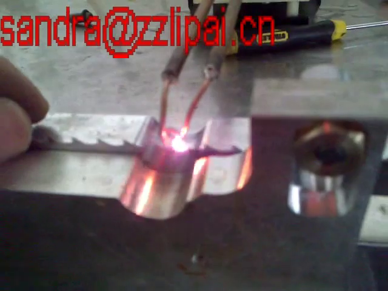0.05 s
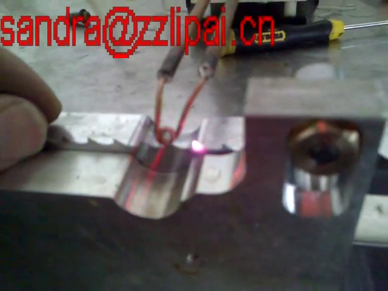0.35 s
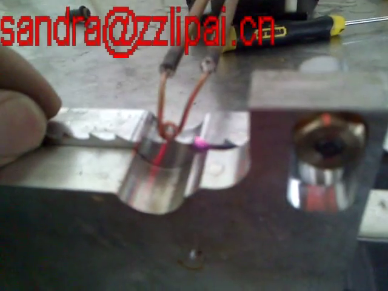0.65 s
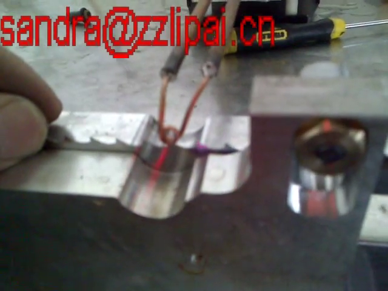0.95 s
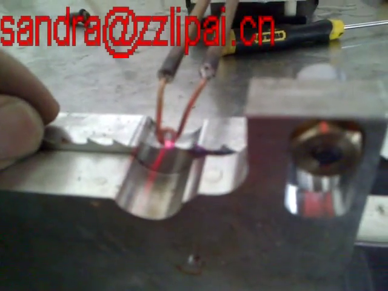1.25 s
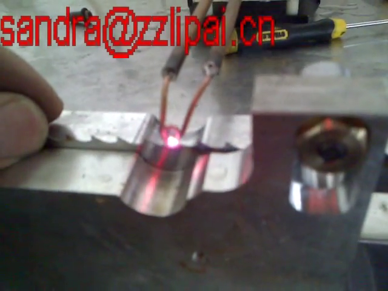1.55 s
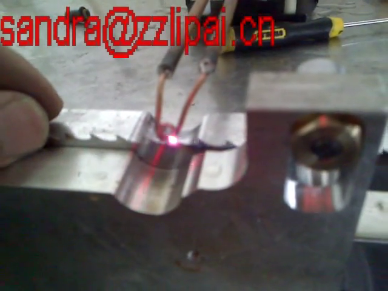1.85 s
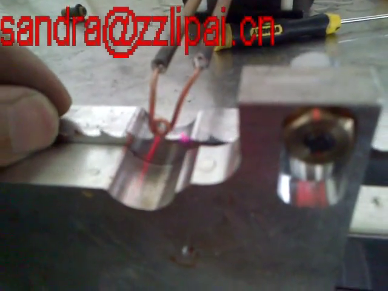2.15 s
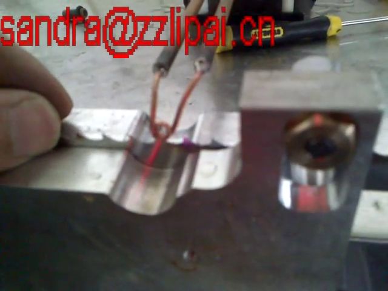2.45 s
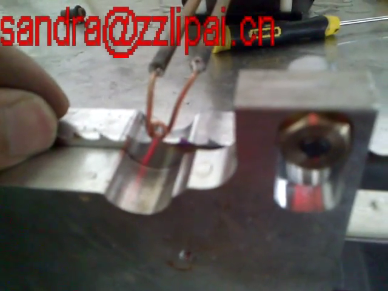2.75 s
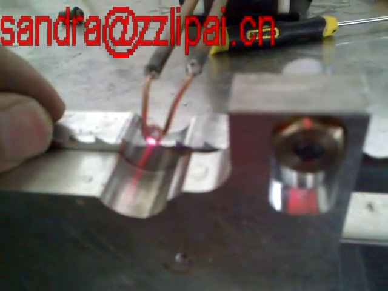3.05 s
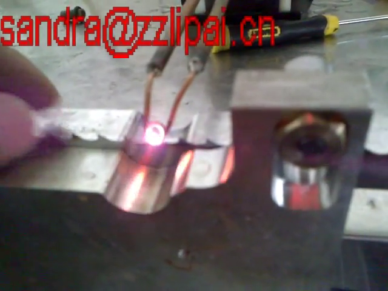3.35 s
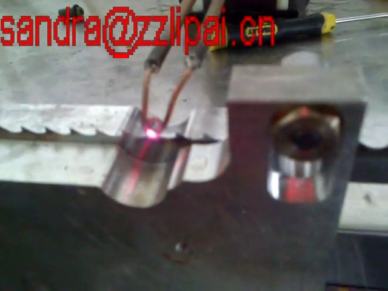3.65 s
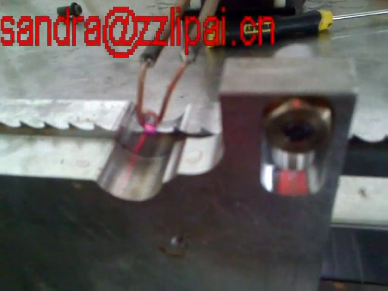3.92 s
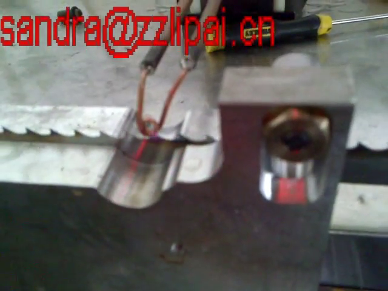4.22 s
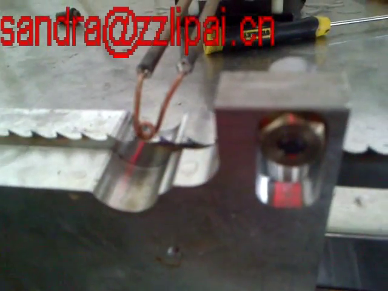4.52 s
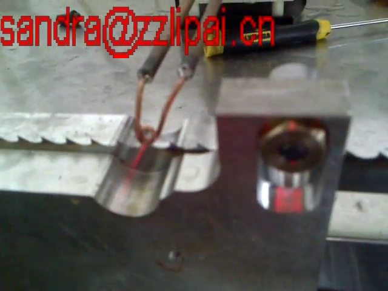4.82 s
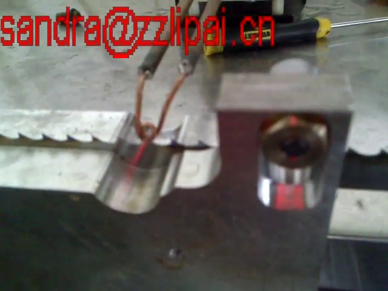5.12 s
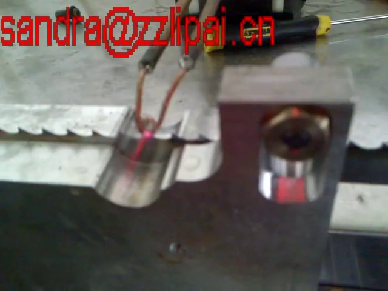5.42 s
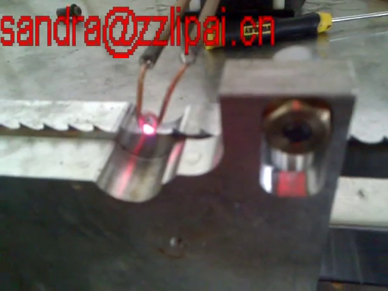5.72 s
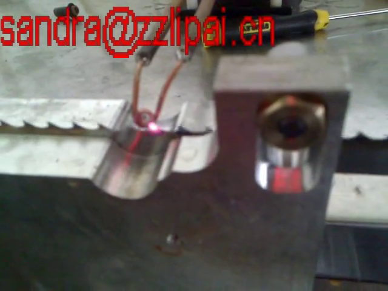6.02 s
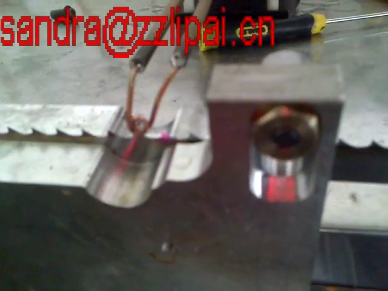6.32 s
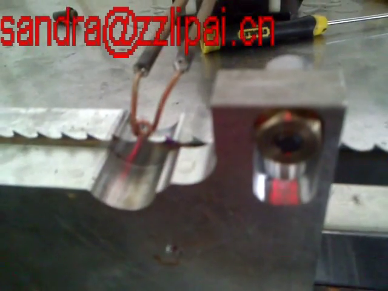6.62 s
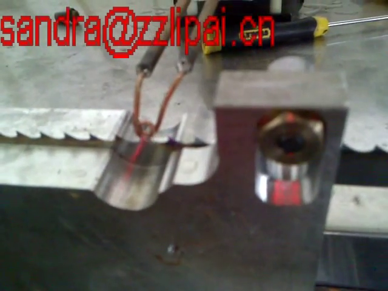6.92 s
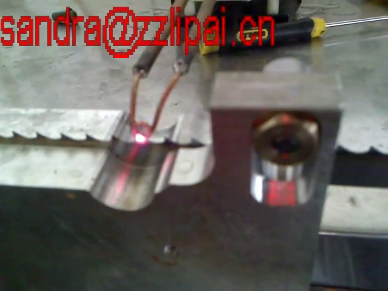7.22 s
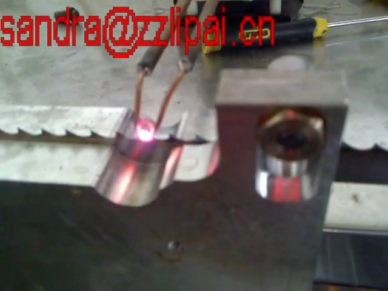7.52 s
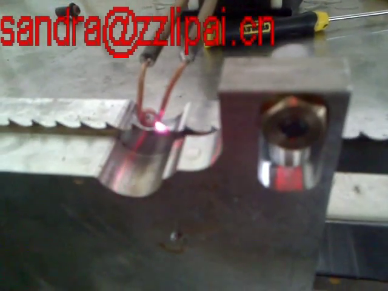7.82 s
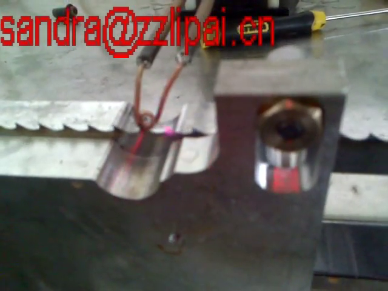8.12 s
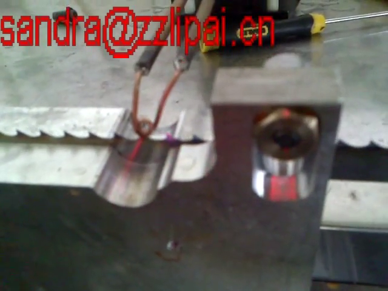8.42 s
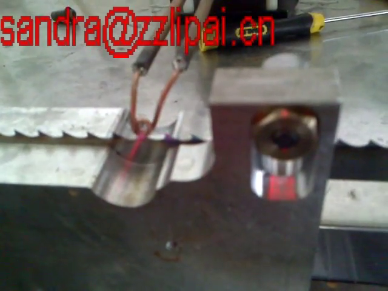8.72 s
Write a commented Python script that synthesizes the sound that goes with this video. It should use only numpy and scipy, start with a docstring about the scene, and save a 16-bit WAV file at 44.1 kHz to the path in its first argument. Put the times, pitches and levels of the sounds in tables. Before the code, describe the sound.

An induction heater's cooling pump runs throughout, a steady, slightly wavering high whine over an even hiss of flowing water and air. The heating coil adds a thin, very high buzz with a faint sizzle five times as it heats the teeth of a saw blade: at the very start until 0.3 seconds, then from about 1.4 to 2, 3.3 to 3.7, 5.6 to 6.2 and 7.2 to 8 seconds. A soft hiss swells briefly around 1.6 seconds. At 4.5 seconds a bright hiss like compressed air sets in and stops at about 5.7. It returns at 6.2 seconds and stays until the end, around 9 seconds, growing slightly while the pump's whine eases a little. Everything is heard from one close microphone at a workshop bench, with no room echo.

```python
"""Induction hardening at a workshop bench

One microphone close by, no room echo. An induction heater hardens a saw blade tooth by tooth.
Its cooling-water pump whines and hisses throughout; the pulsed coil sings a thin, high buzz in each
of five heating shots. Halfway, a bright hiss like compressed air sets in, stops briefly and returns."""
import sys
import numpy as np
from scipy import signal
from scipy.fft import rfft, irfft, next_fast_len
from scipy.io import wavfile

SR = 44100
rng = np.random.default_rng(int(sys.argv[2]) if len(sys.argv) > 2 else 0)


def digitize_waveform(pressure):
    """Quantize a signal to 16-bit integers and store it at the path in sys.argv[1].

    Rows of a 2-D input are taken as channels; values are limited to [-1, 1].
    """
    field = np.atleast_2d(pressure).T
    bounded = np.clip(field, -1, 1)
    quanta = np.round(bounded * 32767).astype(np.int16)
    wavfile.write(sys.argv[1], SR, quanta)


N = 390712
TIME = np.arange(N) / SR
SHAFT_HZ, VANES = 47.455, 40

# pump whine, clustered round the vane harmonics: (multiple of the shaft rate, level [dB])
WHINE_LINES = [(37, -53.5), (38, -50.5), (39, -56), (40, -49.5), (41, -43), (42, -52.5), (80, -54),
               (81, -61), (82, -66), (118, -60.5), (119, -64), (120, -56.5), (154, -58), (158, -59),
               (159, -55.5), (160, -60.5), (162, -56.5), (163, -58), (164, -57), (198, -55.5), (199, -54.5),
               (200, -65), (201, -56.5), (202, -63), (238, -59), (239, -60), (242, -62)]


def from_db(db):
    """Decibels to gain."""
    return 10 ** (np.asarray(db) / 20)


def bump(x, centre, width):
    """Shape of a resonance or a swell: 1 on top, a half at one width from the centre."""
    return 1 / (1 + ((x - centre) / width) ** 4)


def drift(rate_hz):
    """Slow random wander with spread 1: coarse noise twice through a one-pole low-pass."""
    step, settling = 40, 2000
    pole = np.exp(-2 * np.pi * rate_hz * step / SR)
    coarse = rng.standard_normal(N // step + settling + 2)
    slow = signal.lfilter([1], [1, -2 * pole, pole * pole], coarse)[settling:]
    return np.interp(np.arange(N) / step, np.arange(len(slow)), slow / slow.std())


def noise(spectrum, resonances=()):
    """Turbulent noise whose density runs straight between the given points on a log-frequency axis."""
    hz, level_db = np.transpose(spectrum)
    size = next_fast_len(N)
    bins = np.maximum(np.fft.rfftfreq(size, 1 / SR), 1)
    density_db = np.interp(np.log(bins), np.log(hz), level_db)
    density_db += sum(boost_db * bump(bins, centre, width) for centre, width, boost_db in resonances)
    white = rfft(rng.standard_normal(size))
    return irfft(white * from_db(density_db), size)[:N] * np.sqrt(SR / 2)


def cycles(hz):
    """Turns made so far at a changing rate."""
    return np.cumsum(hz) / SR


def tone(turns):
    """A sine of rms 1 with a random starting phase."""
    return np.sqrt(2) * np.sin(2 * np.pi * (turns + rng.random()))


def pump_whine(shaft, waver_db, jitter_turns):
    """Unequal vanes split each vane harmonic into lines one shaft rate apart."""
    whine = np.zeros(N)
    for k, level_db in WHINE_LINES:
        gain = from_db(level_db + waver_db * drift(9.5))
        jitter = jitter_turns * np.sqrt(k / VANES) * drift(7.0)   # the flow unsettles high lines most
        whine += gain * tone(round(k) * shaft + jitter)
    return whine


def pump_churn(shaft, waver_db):
    """Water churns alike on every turn: a skirt of weak shaft harmonics round each vane harmonic."""
    # skirts of the churning water: (multiple of the vane rate, width [Hz], peak level [dB])
    bands = [(1, 290, -58.5), (2, 140, -65), (3, 61, -60), (4, 330, -68), (5, 170, -59), (6, 200, -63),
             (7, 160, -62.5), (8, 150, -71)]
    orders, size = np.arange(325), 8192
    skirts = sum(from_db(level_db) * bump(orders * SHAFT_HZ, round(k) * VANES * SHAFT_HZ, width)
                 for k, width, level_db in bands)
    skirts *= np.minimum(orders / VANES, 1) ** 2   # the housing radiates little below the vane rate
    skirts[[round(k) for k, _ in WHINE_LINES]] = 0   # these harmonics belong to the whine
    phases = np.exp(2j * np.pi * rng.random(len(orders)))
    one_turn = irfft(skirts * phases, size) * size / np.sqrt(2)
    churn = np.interp(shaft % 1 * size, np.arange(size), one_turn)
    return churn * from_db(waver_db * drift(8.5))


def cooling_rush(flicker_db):
    """Steady flow noise of water and air, coloured by the cabinet on its way to the microphone."""
    # flow noise: (frequency [Hz], density [dB per Hz])
    flow = [(140, -135), (190, -110), (320, -106), (600, -95.5), (1000, -84), (1500, -73), (1900, -72.5),
            (2300, -73), (3100, -78), (4200, -80.5), (6500, -82.5), (8700, -80), (12500, -80.5),
            (15500, -85.5)]
    # cabinet resonances: (frequency [Hz], width [Hz], boost [dB])
    panels = [(1868, 115, 4.5), (2700, 140, 0.8), (3490, 250, 1.5), (4660, 140, 1.5)]
    return noise(flow, panels) * from_db(flicker_db * drift(10.3))


def pump_throb(sound, shaft, depth, above_hz):
    """The pump's treble swells once a turn."""
    treble = signal.sosfilt(signal.butter(1, above_hz, "high", fs=SR, output="sos"), sound)
    return sound + depth * tone(shaft) * treble


def cabinet_fan(waver_db):
    """The fan's tones wander with its speed, over a faint rumble from the bench."""
    # hum and whistle of the fan: (frequency [Hz], level [dB])
    lines = [(86, -97), (227.5, -90.5), (341, -97), (455, -88.5), (514, -89), (569, -84), (1786, -55),
             (1877, -67)]
    # bench rumble: (frequency [Hz], density [dB per Hz])
    rumble = [(20, -106), (55, -114), (85, -118), (115, -137), (200, -160)]
    fan_time = cycles(1 + 0.00076 * drift(1.8))
    hum = sum(from_db(level_db + waver_db * drift(7.8)) * tone(hz * fan_time) for hz, level_db in lines)
    return hum + noise(rumble)


def coil_buzz(pulse_hz, ramp_s, waver_db, sizzle_flicker_db):
    """The pulsed current shakes coil and blade; at each tooth the blade favours other partials."""
    # heating shots: (on [s], off [s], blade resonance [Hz], width [Hz], boost [dB])
    shots = [(-.05, .328, 13150, 900, 8), (1.422, 2.03, 13650, 250, 9), (3.272, 3.747, 14400, 350, 9),
             (5.605, 6.19, 14000, 400, 9), (7.2, 7.996, 14300, 300, 6)]
    # coil buzz: (multiple of the pulse rate, level before the blade's boost [dB])
    partials = [(4, -65), (5, -52.5), (6, -64), (7, -65), (8, -59.5), (10, -81), (11, -57), (12, -53),
                (13, -53.5), (14, -57), (16, -73), (17, -58), (18, -54), (19, -54), (20, -54), (21, -55),
                (22, -53), (23, -49), (24, -49)]
    # sizzle that comes with the current: (frequency [Hz], density [dB per Hz])
    sizzle = [(300, -160), (2000, -105), (4500, -93), (8000, -86.5), (10000, -89), (12000, -87),
              (15500, -80)]
    gates = [np.clip(np.minimum(TIME - on, off - TIME) / ramp_s + .5, 0, 1) for on, off, *_ in shots]
    turns = cycles(pulse_hz * (1 + 6e-5 * drift(2.6)))
    buzz = sum(gates) * noise(sizzle) * from_db(sizzle_flicker_db * drift(25))
    for k, level_db in partials:
        drive = sum(gate * from_db(boost_db * bump(k * pulse_hz, hz, width))
                    for gate, (_, _, hz, width, boost_db) in zip(gates, shots))
        buzz += drive * from_db(level_db + waver_db * drift(5.9)) * tone(round(k) * turns)
    return buzz


def hiss_swell(middle_s, half_length_s):
    """A soft hiss comes and goes once, around the second shot."""
    # the hiss at its height: (frequency [Hz], density [dB per Hz])
    hiss = [(400, -150), (2000, -100), (4500, -79.5), (6500, -86), (12000, -95)]
    return noise(hiss) * bump(TIME, middle_s, half_length_s)


def air_jet(closing_s, flutter_db):
    """Bright jet noise follows the flow through a valve; the nozzle's edge noise grows with its square."""
    # valve openings: (start [s], opening time [s], shut [s], strength [dB], rise [dB per s])
    blasts = [(4.495, 0.069, 5.665, -35.8, -0.2), (6.218, 0.12, 6.735, -35.5, -3.5),
              (6.61, 0.17, 9.3, -36.5, 1.02)]
    # air jet: (frequency [Hz], density at a strength of 0 dB [dB per Hz])
    jet = [(700, -95), (2500, -46.5), (3500, -44.5), (4300, -44), (5500, -40), (7000, -39), (8300, -37),
           (9800, -37.5), (11700, -34), (13300, -35.5), (15500, -40.5)]
    # edge noise: (frequency [Hz], density at a strength of 0 dB [dB per Hz])
    nozzle = [(4000, -66), (9800, -17), (11200, -3.5), (12600, -10), (15500, -19)]
    flows = []
    for start, opening_s, shut, level_db, rise_db_per_s in blasts:
        valve = np.clip(np.minimum((TIME - start) / opening_s, (shut - TIME) / closing_s), 0, 1)
        flows.append(valve * from_db(level_db + rise_db_per_s * (TIME - start)))
    strength = np.linalg.norm(flows, axis=0)   # overlapping blasts add in power
    strength *= from_db(flutter_db * drift(22))
    return strength * noise(jet) + strength ** 2 * noise(nozzle)


def scene():
    """Everything reaches one microphone at the bench, so both channels are alike."""
    shaft = cycles(SHAFT_HZ * (1 + 0.0002436 * drift(1.276)))
    pump = pump_whine(shaft, waver_db=1.44, jitter_turns=0.061) + pump_churn(shaft, waver_db=4.0)
    pump *= from_db(-1.5 - np.maximum(TIME - 6.7, 0))   # holds until 6.7 s, then sinks 1 dB a second
    mono = pump_throb(pump + cooling_rush(flicker_db=0.51), shaft, depth=0.047, above_hz=5500)
    mono += cabinet_fan(waver_db=5.0)
    mono += coil_buzz(pulse_hz=649.75, ramp_s=0.017, waver_db=2.3, sizzle_flicker_db=2.0)
    mono += air_jet(closing_s=0.16, flutter_db=0.6)
    mono += hiss_swell(middle_s=1.6, half_length_s=0.16)
    return np.stack([mono, mono])


def record(dry):
    """The microphone's signal is cut steeply at the top and rests on a tiny constant offset."""
    cutoff_hz, offset = 15740, .0019
    low_pass = signal.ellip(14, .1, 80, cutoff_hz, fs=SR, output="sos")
    return signal.sosfilt(low_pass, dry) + offset


dry = scene()
out = record(dry)
digitize_waveform(out)
```